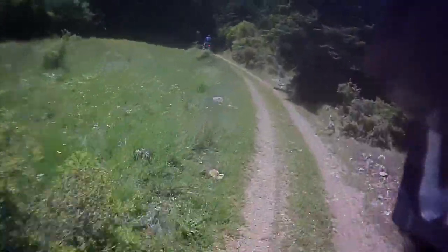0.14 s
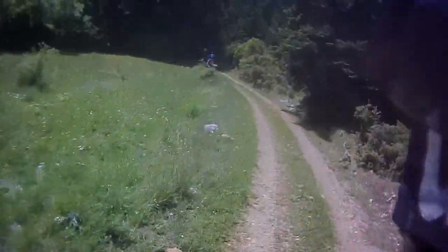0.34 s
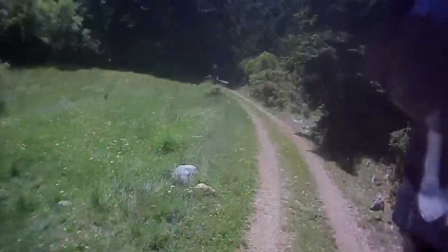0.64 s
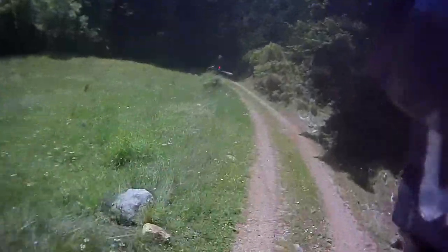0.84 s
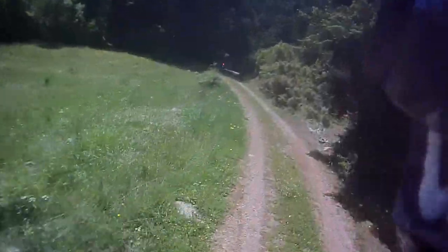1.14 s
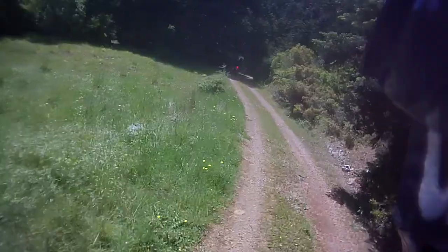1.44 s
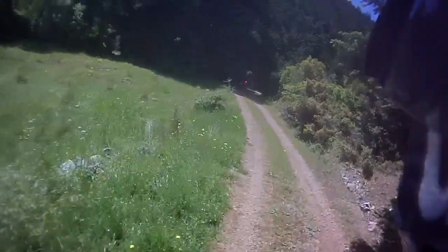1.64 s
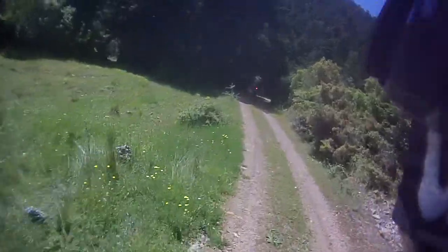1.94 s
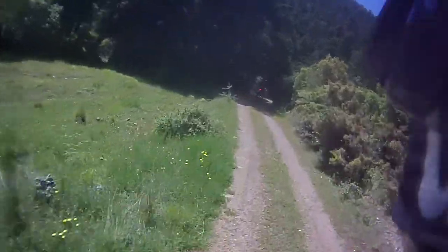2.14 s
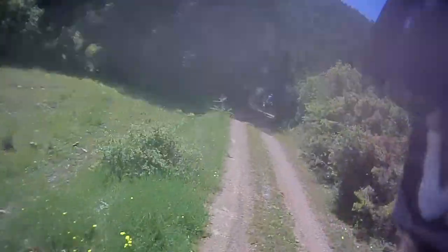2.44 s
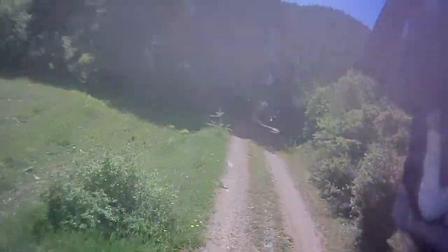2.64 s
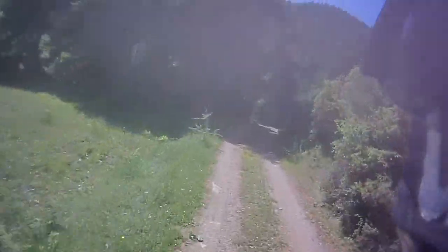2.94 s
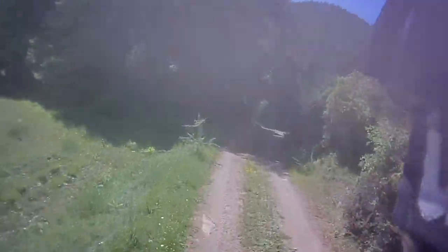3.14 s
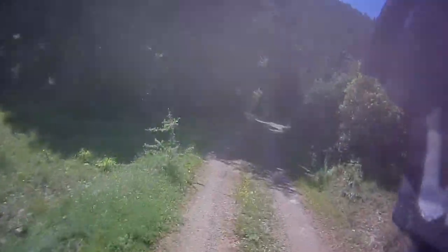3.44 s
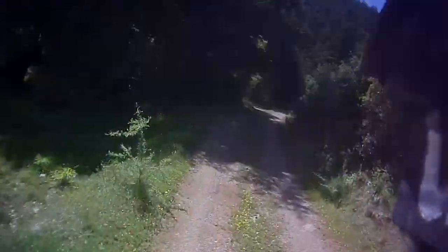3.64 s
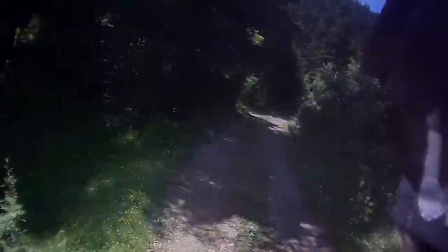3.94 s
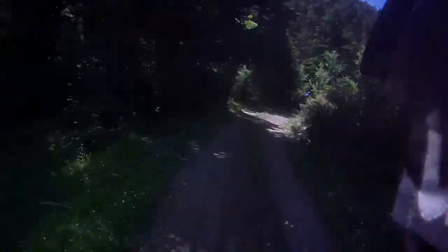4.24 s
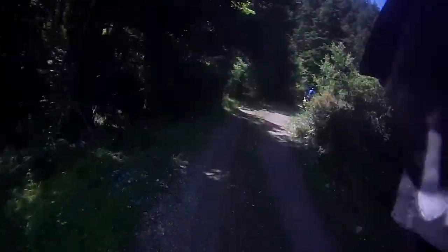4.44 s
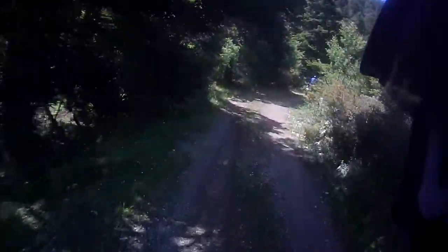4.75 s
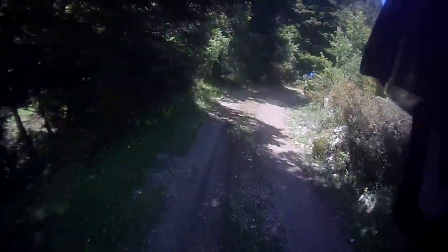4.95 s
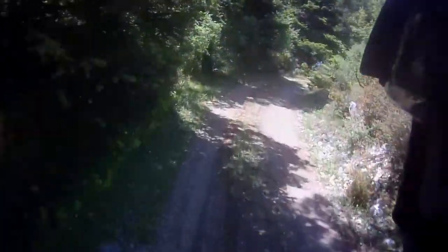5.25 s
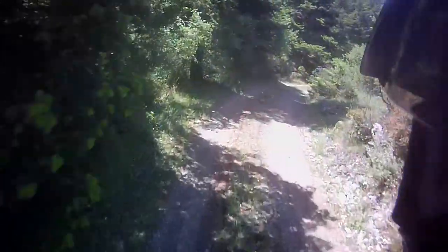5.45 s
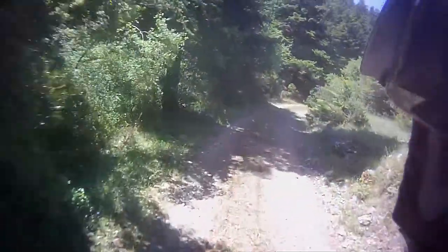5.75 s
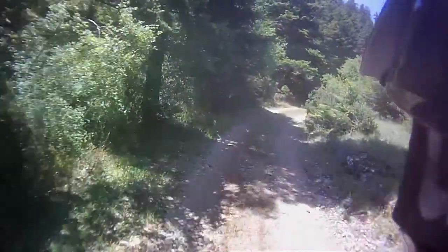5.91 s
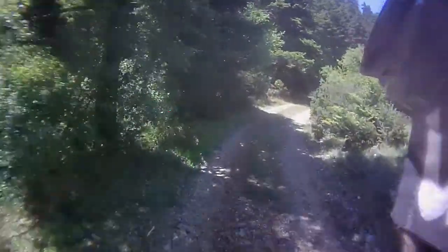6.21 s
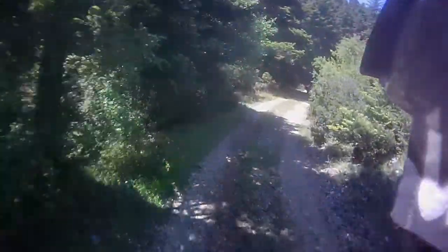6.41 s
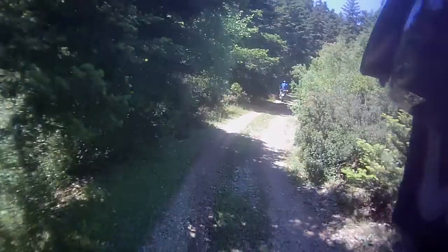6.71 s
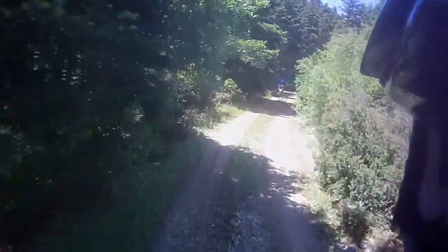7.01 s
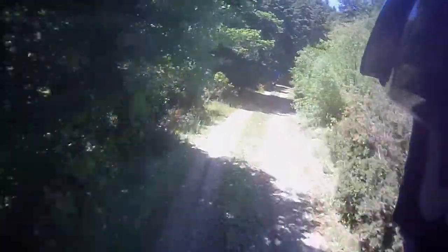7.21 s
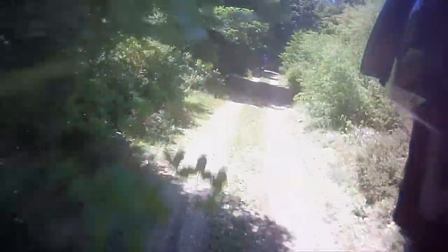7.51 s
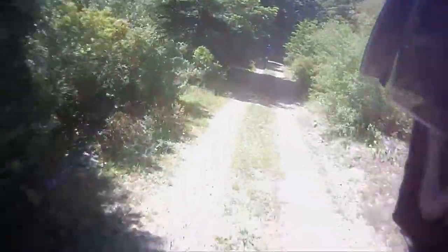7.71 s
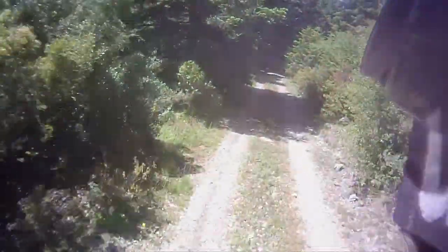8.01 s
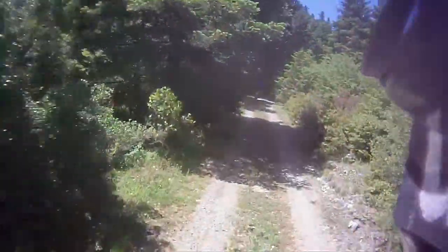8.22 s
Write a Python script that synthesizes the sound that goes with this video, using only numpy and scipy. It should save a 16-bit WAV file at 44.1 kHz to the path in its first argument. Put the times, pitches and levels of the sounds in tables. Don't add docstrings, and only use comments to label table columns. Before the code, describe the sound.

Close, mono and rough: wind buffets a camera microphone on a rider's helmet above a low thumping motorcycle engine. Revs rise briefly, then fall and settle, the firing strengthening and weakening with the throttle. Grit ticks and occasional leaf brushes touch the housing. As the ride slows, hiss recedes and soft mechanical rustle emerges. A faint scratch precedes one violent clipped twig crack with rebounds, then leafy flicks and a rising engine.

```python
import sys
import numpy as np
from scipy import signal
from scipy.fft import rfft, irfft, next_fast_len
from scipy.io import wavfile
from scipy.ndimage import uniform_filter1d

SR = 44100
rng = np.random.default_rng(int(sys.argv[2]) if len(sys.argv) > 2 else 0)


def gain_from_decibels(decibels):
    exponent = np.asarray(decibels, float) / 20
    return 10 ** exponent


def transcribe(u):
    v = np.clip(np.atleast_2d(u).T, -1, 1)
    q = np.round(v * 32767).astype(np.int16)
    wavfile.write(sys.argv[1], SR, q)


N = 369116

# t/s, firing rate/Hz
SPEED = [(0.0, 35.8), (0.17, 36.25), (0.48, 39.74), (0.62, 38.45), (0.92, 30.73), (1.07, 31.25),
         (2.45, 29.86), (2.58, 28.9), (3.1, 30.24), (3.27, 28.85), (4.5, 27.85), (4.62, 28.24),
         (5.49, 27.89), (5.81, 25.7), (6.02, 26.8), (6.8, 25.68), (7.73, 26.09), (8.37, 29.95)]
# t/s, firing level from then on/dB
THROTTLE = [(0, -.5), (.52, -8), (.8, -19), (1.0, -3), (1.55, -10.5), (2.8, -17), (3.1, -9), (3.68, -2),
            (4.05, -20), (5.19, -1.5), (5.68, -13), (6.05, -20), (7.4, -12), (7.68, -3.5), (8.03, .5)]
# f/Hz, density/dB per Hz
GAS_COLOUR = [(100, -16), (190, -2), (300, -6), (500, 0), (700, -1), (900, -16), (1300, -45)]
# t/s, level above the lee/dB
AIR_SPEED = [(0, 22), (.5, 18), (1.0, 21), (1.4, 14), (1.9, 26), (2.5, 20.5), (3.1, 18.5), (3.8, 18),
             (4.3, 15), (5.0, 12.5), (5.6, 12.5), (6.3, 10), (6.8, 4), (7.3, 3), (7.9, 1), (8.37, 13)]
# t/s, level/dB, half length/s
GUSTS = [(0, -12, 0.097), (.1, 2.5, .04), (.33, -9, 0.19), (.44, 7, 0.081), (.66, -2.5, 0.07),
         (1.32, 6.5, 0.17), (1.43, 1, 0.049), (1.77, -1, 0.083), (1.95, -3, .1), (2.12, -1, 0.14),
         (2.37, 0, 0.11), (2.61, 1.5, 0.026), (2.72, 1.5, .09), (2.92, -6.5, 0.12), (3.24, -7, 0.14),
         (3.335, 9, 0.014), (3.37, 4.5, 0.033), (3.43, 3.5, .07), (3.54, -1, 0.092), (4.1, -1, 0.082),
         (4.21, 4, 0.035), (4.3, -12, 0.028), (4.52, 6.5, 0.17), (4.72, 3.5, 0.12), (4.86, -6, 0.075),
         (5.55, -12, 0.12), (6.3, 3.5, 0.051), (6.82, -12, 0.075), (7.04, 7.5, 0.1)]
# t/s, level/dB, half length/s
PUFFS = [(0.04, -11, 0.015), (0.127, 6.5, 0.024), (0.262, 8, 0.015), (0.302, 4, 0.003), (0.337, -7, 0.036),
         (0.446, 2, 0.0083), (0.479, 7, 0.047), (0.519, 3.0, 0.009), (1.025, 3.5, 0.033),
         (1.095, -5, 0.008), (1.127, -2, 0.036), (1.22, -1.5, 0.039), (1.28, 3.5, 0.019), (1.462, -6, 0.04),
         (1.554, 5.5, 0.031), (1.616, 3, 0.02), (1.681, -4.0, 0.036), (1.719, 6, 0.022), (1.793, 5, 0.037),
         (1.838, 4.5, 0.011), (1.998, -5, 0.0054), (2.038, -7, 0.04), (2.108, 1, 0.016),
         (2.207, 1.5, 0.019), (2.31, 0, 0.027), (2.392, 0, 0.034), (2.567, -2, 0.029), (2.614, 2.5, 0.024),
         (2.664, -1, 0.011), (2.689, -6, 0.025), (2.744, 5, 0.0099), (2.789, 4.0, 0.029),
         (2.898, -1, 0.007), (2.946, -4, 0.036), (2.993, 1.5, 0.04), (3.046, -3, 0.0092),
         (3.078, 2.5, 0.011), (3.258, 3, 0.026), (3.3, -3.5, 0.04), (3.337, 4.5, 0.04), (3.392, 2, 0.011),
         (3.422, 5, 0.005), (3.46, -2, 0.0063), (3.5, -6.5, 0.023), (3.574, -6, 0.027), (3.627, -1, 0.014),
         (3.664, -2, 0.013), (3.844, 5, 0.035), (3.879, -2, 0.006), (3.976, 9, 0.013), (3.998, -3.5, 0.029),
         (4.066, 2.0, 0.038), (4.146, -3.5, 0.022), (4.21, 3.0, 0.04), (4.29, -5, 0.011),
         (4.325, -7, 0.047), (4.345, 9, 0.012), (4.46, 6, 0.016), (4.839, -2, 0.04), (4.964, 0, 0.025)]
# t/s, level/dB, half length/s
LUMPS = [(.2, 2.5, 0.15), (1.2, 3.5, .1), (.52, 0, 0.16), (.9, -1, .15), (1.43, 6.5, 0.1), (1.65, 4, 0.095),
         (1.77, -6, 0.054), (2.5, 3.5, 0.11), (2.64, -3.5, 0.055), (3.08, -1.5, 0.075), (3.28, 6.5, 0.078),
         (3.41, -4, 0.093), (3.75, 1.5, 0.081), (3.92, 1, 0.15), (4.2, -4, 0.15), (4.78, -4.5, 0.21),
         (5.05, 2, 0.062), (4.85, -1, 0.046), (5.5, 1, .08), (5.85, -3, 0.16), (6.3, -2.5, 0.15),
         (6.82, -8, 0.045), (6.72, 1, .05), (7.4, 4.5, 0.22), (7.95, 1, 0.22), (8.28, -5, .15),
         (5.35, 0.5, .12), (.32, -2.5, 0.15)]
# f/Hz, density/dB per Hz
BUFFET_COLOUR = [(3, -9.5), (10, -7.5), (20, 0.5), (60, 3), (120, 0.5), (250, -15.5)]
# f/Hz, density/dB per Hz
FLUTTER_COLOUR = [(60, -24), (180, 1), (350, -4.5), (550, -7.5), (750, -12.5), (1000, -24), (1600, -39)]
# f/Hz, density/dB per Hz
HISS_COLOUR = [(500, 2), (1000, 3.5), (2500, -3), (4000, -10.5), (6000, -27.5), (8300, -40.5),
               (9200, -54.5), (15000, -74)]
# t/s, peak level/dB
POPS = [(0.0864, -32), (0.1062, -22), (0.1955, -29), (0.2596, -23), (0.4092, -25), (0.7008, -18.5),
        (1.2161, -22.5), (1.4116, -21), (1.4765, -25), (1.614, -18), (1.697, -16), (1.7404, -17),
        (2.0652, -19), (2.1064, -18.5), (2.1994, -21), (2.2772, -21), (2.3877, -17), (2.5306, -18),
        (2.6105, -20), (2.662, -19), (2.9886, -29), (3.1443, -28), (3.2725, -33), (3.322, -23), (3.39, -24),
        (3.5124, -23), (3.6254, -23), (3.6591, -22), (4.342, -21), (4.3974, -28), (4.591, -23)]
# t/s, peak level/dB, centre f/Hz, width/Hz, ring/s
TOUCH = [
    (7.4825, -32.5, 1620, 350, 0.083),
    (7.4835, -31.5, 2270, 720, 0.1),
    (7.4835, -28, 3800, 900, 0.058),
    (7.484, -33, 5370, 450, 0.092),
    (7.482, -40, 5100, 5000, 0.1),
]
# t/s, peak level/dB, centre f/Hz, width/Hz, ring/s
WHIP = [(7.6225, -39, 5500, 5000, 0.012), (7.6287, -11, 5270, 6000, 0.01), (7.6322, -3, 4600, 5650, 0.014),
        (7.638, -24, 9800, 11100, .018), (7.639, -16.5, 5800, 5600, 0.016),
        (7.6483, -12, 5400, 9500, 0.006), (7.650, -26, 3380, 1500, 0.018), (7.6335, -12, 506, 500, 0.014),
        (7.6562, -23, 5600, 8000, 0.0045), (7.6839, -22, 3600, 3000, 0.0078),
        (7.734, -33, 3000, 6000, 0.07), (7.651, -34, 5400, 1500, 0.037), (7.66, -36.5, 1770, 2270, 0.19)]
# t/s, peak level/dB, f/Hz, ring/s
TAPS = [
    (7.6288, -3, 3800, .014),
    (7.6326, -1, 3300, .013),
    (7.6327, -10, 7300, .008),
    (7.6486, -4, 3300, .007),
    (7.6564, -22, 4900, .006),
    (7.6844, -10, 3700, .005),
    (7.632, -8, 250, .05),
    (7.633, -16, 1050, .035),
]
# t/s, f/Hz, level/dB
SQUEAK = [
    (7.6355, 2900, -40),
    (7.6372, 3150, -5),
    (7.639, 3800, -1),
    (7.640, 4050, 0),
    (7.6414, 3850, -2),
    (7.643, 3600, -15),
    (7.6447, 4250, -3),
    (7.6457, 4300, -17),
    (7.6475, 4400, -40),
]
# t/s, peak level/dB
TICKS = [(0.2293, -34), (0.2592, -35.5), (0.2695, -36), (0.64, -33), (0.6994, -48), (0.7751, -34.5),
         (0.957, -36), (1.3598, -32), (1.386, -44), (1.675, -28), (1.8302, -38), (2.1094, -42),
         (2.7382, -38), (2.789, -49), (3.495, -53), (3.76, -43.5), (5.438, -44), (5.7864, -37),
         (5.909, -35), (6.902, -33),
         (.4415, -40), (1.2187, -40), (1.279, -42), (1.297, -41), (1.338, -42), (1.5123, -44), (1.5517, -41),
        (1.6885, -44), (1.7228, -40), (1.7566, -40), (1.8437, -37), (1.9074, -38), (1.979, -44),
        (2.3172, -39), (2.3512, -38), (2.398, -36), (2.519, -40), (2.5384, -45), (2.692, -43), (3.115, -46),
        (3.3243, -42), (3.4465, -41), (3.771, -42), (3.8613, -42), (4.0653, -45), (4.1966, -42),
        (5.324, -41), (5.6666, -40), (6.86, -32), (7.2413, -40)]
# t/s, peak level/dB, centre f/Hz, ring/s
LEAVES = [
    (3.322, -34, 2000, 0.16),
    (4.2, -34, 3220, 0.06),
    (5.3244, -30, 3560, 0.087),
    (6.8592, -25, 2800, 0.11),
    (8.3, -25, 3220, 0.11),
]
# t/s, peak level/dB, centre f/Hz, width/Hz, ring/s
LEAF_TIPS = [
    (8.1925, -46, 7600, 2500, .013),
    (8.2055, -52, 7500, 3000, .015),
    (8.2285, -44.5, 6850, 2500, 0.036),
    (8.28, -48, 7500, 3000, .015),
]
# f/Hz, density/dB per Hz
ROLL_COLOUR = [(700, -18), (1400, 2.5), (2200, 6), (3000, 0), (3900, -1.5), (5000, -9.5), (8200, -20.5),
               (9500, -37.5)]
# f/Hz, density/dB per Hz
CIRCUIT_COLOUR = [(5000, -5), (9500, 5), (11500, 1.5), (12200, 1.5), (12800, 9), (13500, -4), (15500, -1.5)]


def level(x, db):
    return x * gain_from_decibels(db) / np.sqrt(np.mean(x ** 2))


def curves(table):
    s, *columns = np.transpose(table)
    return [np.interp(np.arange(N) / SR, s, c) for c in columns]


def swells(table):
    t = np.arange(0, N, 100) / SR
    total = sum(db * np.exp(-((t - s) / half) ** 2) for s, db, half in table)
    return np.interp(np.arange(N) / SR, t, total)


def walk(rate):
    k = int(SR / rate)
    held = np.repeat(rng.standard_normal(N // k + 1), k)
    return 0.67 * uniform_filter1d(uniform_filter1d(held, k), k)[:N]


def eddies(colour, shared_db, own_db, rate):
    size = next_fast_len(N)
    octave = np.log2(np.maximum(np.arange(size // 2 + 1) * SR / size, 1))
    hz, db = np.transpose(colour)
    gain_db = np.interp(octave, np.log2(hz), db, left=-90, right=-90)
    spectrum = rfft(rng.standard_normal(size)) * gain_from_decibels(gain_db)
    total = np.zeros(N)
    for centre in np.arange(np.floor(np.log2(hz[0])), np.log2(hz[-1]) + 1):
        band = irfft(spectrum * np.clip(1 - abs(octave - centre), 0, 1), size)[:N]
        total += band * gain_from_decibels(own_db * walk(rate))
    return level(total * gain_from_decibels(shared_db), 0)


def add_scrape(out, s, db, hz, width_hz, ring, rise=0):
    t = np.arange(4096) / SR
    b, a = signal.iirpeak(hz, max(hz / width_hz, .3), SR)
    grain = signal.lfilter(b, a, signal.lfilter(b, a, rng.standard_normal(4096)))
    rise = rise or 0.047 * ring
    shape = (1 - np.exp(-t / rise)) * gain_from_decibels(-60 * t / ring)
    i = int(s * SR)
    out[i:i + 4096] += (level(grain, db) * shape / shape.max())[:N - i]


def dulled(x, order, hz):
    return signal.sosfilt(signal.butter(order, hz, fs=SR, output="sos"), x)


def engine():
    start = -1.07
    cycle = start + np.cumsum(curves(SPEED)[0]) / SR
    throttle_db = throttle()
    return exhaust(cycle, throttle_db) - np.sqrt(2) * gain_from_decibels(-0.5) * crank_hum(cycle, throttle_db), cycle


def throttle():
    s, db = np.transpose(THROTTLE)
    held = db[np.searchsorted(s, np.arange(N) / SR, side="right") - 1]
    ramp = int(.14 * SR)
    return uniform_filter1d(uniform_filter1d(held, ramp, mode="nearest"), ramp, mode="nearest")


def puff(ms):
    blow_down = .45 * np.exp(-(ms / .84) ** 2)
    suction = .185 * np.exp(-((ms - 3.3) / 3.9) ** 2)
    chamber = .125 * (ms > 0) * np.sin(2 * np.pi * .55 * ms) * np.exp(-ms / 9)
    return blow_down - suction + chamber


def exhaust(cycle, throttle_db):
    fire = np.flatnonzero(np.diff(np.floor(cycle)))
    scatter_db = np.clip(.6 - .2 * throttle_db[fire], .6, 5) * rng.standard_normal(len(fire))
    late = (10 * rng.standard_normal(len(fire))).astype(int)
    train = np.zeros(N)
    train[np.clip(fire + late, 0, N - 1)] = gain_from_decibels(throttle_db[fire] + 2 + scatter_db)

    pipe_trip_ms, pipe_loss = 5.5, .65
    ms = np.arange(-200, 1500) / SR * 1e3
    echoes = sum((-pipe_loss) ** k * puff(ms - k * pipe_trip_ms) for k in range(3))
    echoes += .09 * (ms > 0) * np.cos(2 * np.pi * .2 * ms) * (ms / 6.5) * np.exp(1 - ms / 6.5)
    pulses = signal.fftconvolve(train, echoes)[245:N + 245]

    outflow = signal.lfilter([1], [1, -np.exp(-1 / (.012 * SR))], train)
    outflow = uniform_filter1d(uniform_filter1d(outflow, 90), 90)
    gas = gain_from_decibels(-30) * eddies(GAS_COLOUR, 0, own_db=.5, rate=30) * outflow

    drone_from_hz, drone_full_hz = 29.5, 36
    near = np.clip((curves(SPEED)[0] - drone_from_hz) / (drone_full_hz - drone_from_hz), 0, 1)
    drone = np.sqrt(near) * gain_from_decibels(-17 + throttle_db) * np.cos(6 * np.pi * cycle)
    return pulses + gas + drone


def crank_hum(cycle, throttle_db):
    t = np.arange(N) / SR
    beat_s, beat_peak_s, beat_fade_s = 1.05, 1.45, 5.2
    rocking = np.clip((beat_fade_s - t) / beat_s, 0, 1)
    beat_db = 6 * rocking * np.cos(2 * np.pi * (t - beat_peak_s) / beat_s)
    hum_db = -29.5 - 8 * gain_from_decibels(throttle_db) + beat_db
    crank = 2 * np.pi * uniform_filter1d(cycle, 8000, mode="nearest")
    first = gain_from_decibels(hum_db) * np.sin(2 * crank + 0.28 * walk(5.6))
    octave = gain_from_decibels(-38) * np.sin(4 * crank + 1.0 * walk(4.5))
    return first + octave


def wind():
    air_db = curves(AIR_SPEED)[0]
    gust_db = swells(GUSTS) + swells(PUFFS)
    buffet_db = -27 + 0.57 * air_db + 0.18 * gust_db + swells(LUMPS)
    flutter_db = -29 + 0.5 * air_db + 0.2 * gust_db + 0.51
    hiss_db = -52 + 0.93 * air_db + 0.61 * gust_db + 1.5
    gust, flurry = walk(25), walk(90)
    buffet = eddies(BUFFET_COLOUR, 0.24 * gust, own_db=-0.1, rate=5.8)
    flutter = eddies(FLUTTER_COLOUR, 1.4 * gust + 2.06 * flurry, own_db=-2.0, rate=25)
    hiss = eddies(HISS_COLOUR, 0.16 * gust + 0.85 * flurry + 4.9 * walk(300), own_db=-2.0, rate=20)
    return gain_from_decibels(buffet_db) * buffet + gain_from_decibels(flutter_db) * flutter + gain_from_decibels(hiss_db) * hiss


def wind_pops():
    out = np.zeros(N)
    for s, db in POPS:
        add_scrape(out, s, db - 10.5, 2370, 2370, 0.019, .001)
    return dulled(out, 3, 5000)


def twig():
    out = np.zeros(N)
    for row in TOUCH + WHIP:
        add_scrape(out, *row)
    add_scrape(out, 7.661, -29, 3100, 6600, .075, rise=.05)
    return dulled(out, 1, 7000) + twig_squeak() + housing_thud() + housing_taps()


def twig_squeak():
    hz, db = curves(SQUEAK)
    during = db > max(SQUEAK[0][2], SQUEAK[-1][2])
    loudness = during * gain_from_decibels(db + 2.5 * walk(1500))
    return loudness * np.sin(2 * np.pi * np.cumsum(hz * (1 + .05 * walk(1500))) / SR)


def housing_thud():
    since = np.maximum(np.arange(N) / SR - 7.6359, 0)
    shape = gain_from_decibels(-60 * since / 0.028) * (1 - np.exp(-since / 0.0003))
    return shape * np.sin(2 * np.pi * 660 * since)


def housing_taps():
    out = np.zeros(N)
    for s, db, hz, ring in TAPS:
        since = np.maximum(np.arange(N) / SR - s, 0)
        out += gain_from_decibels(db - 60 * since / ring) * np.sin(2 * np.pi * hz * since)
    return out


def grit_and_leaves():
    tick_hz = 5250
    out = np.zeros(N)
    for s, db in TICKS:
        add_scrape(out, s, db - 8, tick_hz, 1.3 * tick_hz, 0.0078, .0003)
    for s, db, hz, ring in LEAVES:
        add_scrape(out, s, db - 8.0, hz, 0.76 * hz, ring, .0015)
    for row in LEAF_TIPS:
        add_scrape(out, *row)
    return dulled(out, 4, 9200)


def rolling(cycle):
    pull_db = 3.54 * gain_from_decibels(throttle())
    throb_db = 0.97 * np.cos(4 * np.pi * cycle) + 2.1 * walk(150)
    return gain_from_decibels(-43.5 + pull_db) * eddies(ROLL_COLOUR, throb_db, own_db=.8, rate=15)


def circuit():
    return gain_from_decibels(-71.5) * eddies(CIRCUIT_COLOUR, 0, own_db=.3, rate=10)


def scene():
    motor, cycle = engine()
    contacts = twig() + grit_and_leaves()
    return (motor + wind() + wind_pops() + contacts + rolling(cycle) + circuit())[None]


def top_cut(x):
    return signal.sosfilt(signal.butter(12, 15440, fs=SR, output="sos"), x)


def record(dry):
    capsule = signal.butter(1, 4.5, "high", fs=SR, output="sos")
    mix = np.clip(signal.sosfilt(capsule, dry), -1, 1)
    return top_cut(mix)


dry = scene()
out = record(dry)
transcribe(out)
```